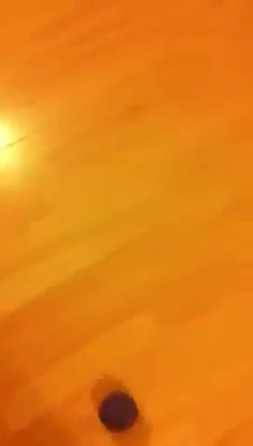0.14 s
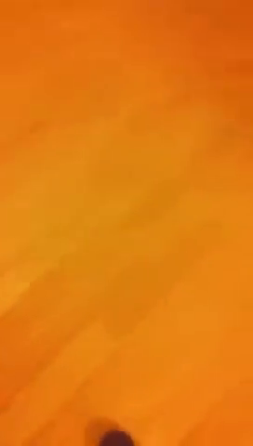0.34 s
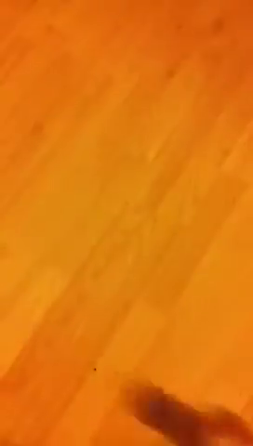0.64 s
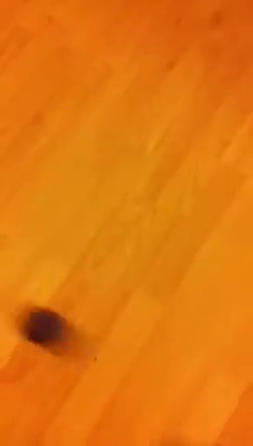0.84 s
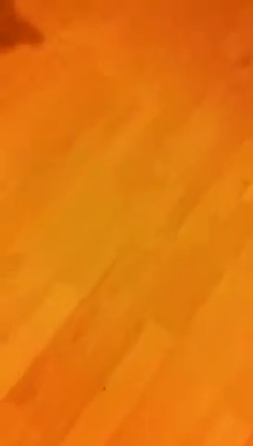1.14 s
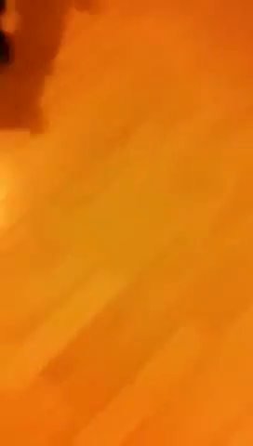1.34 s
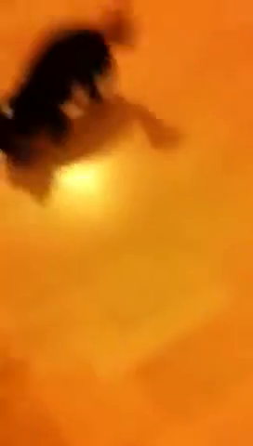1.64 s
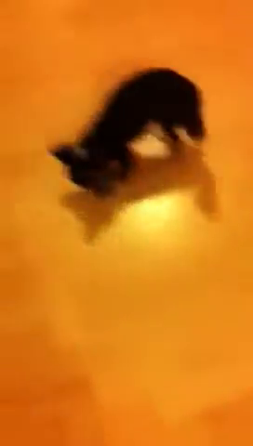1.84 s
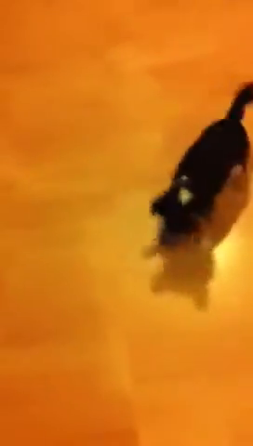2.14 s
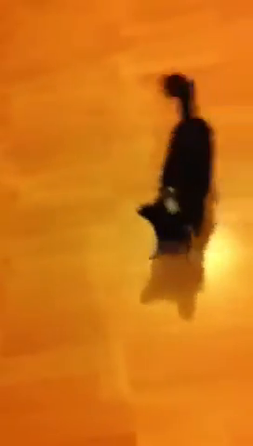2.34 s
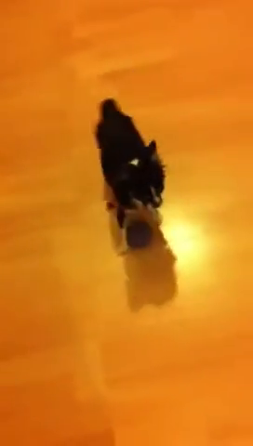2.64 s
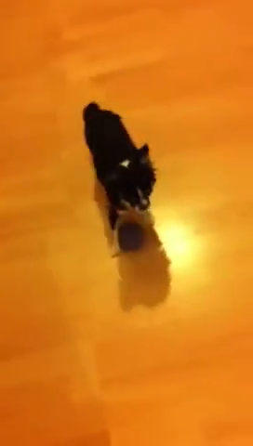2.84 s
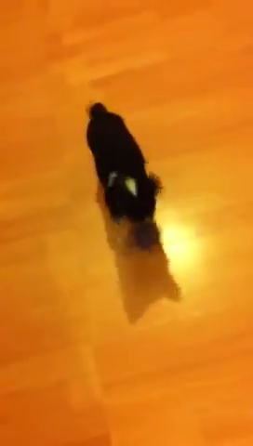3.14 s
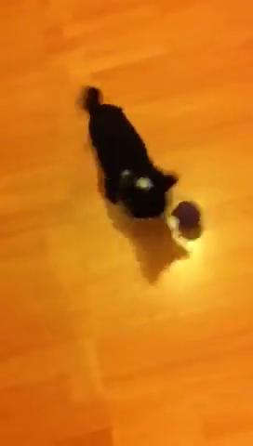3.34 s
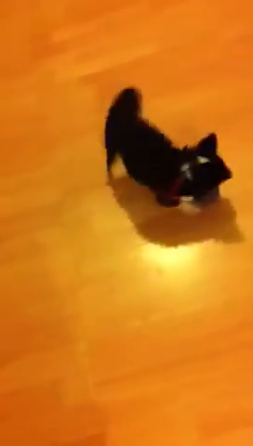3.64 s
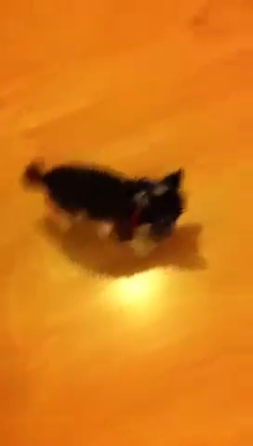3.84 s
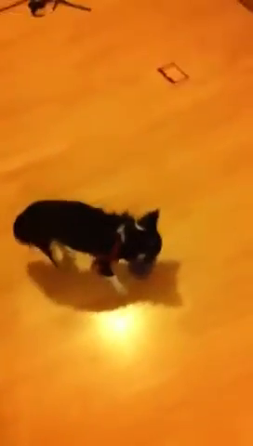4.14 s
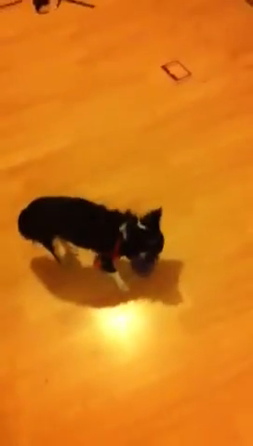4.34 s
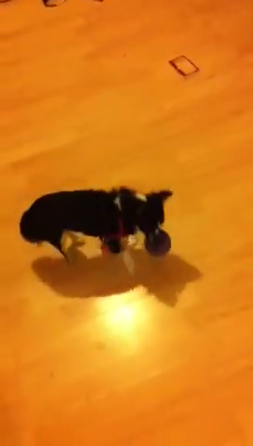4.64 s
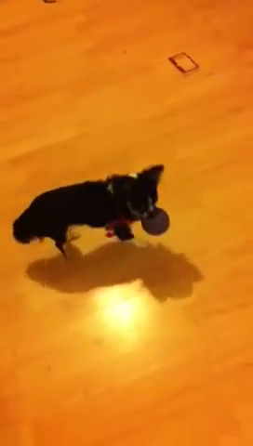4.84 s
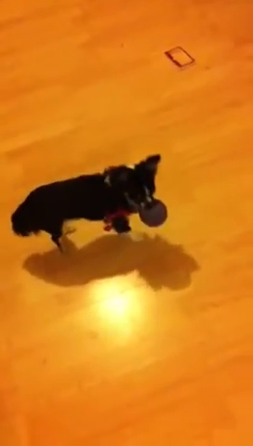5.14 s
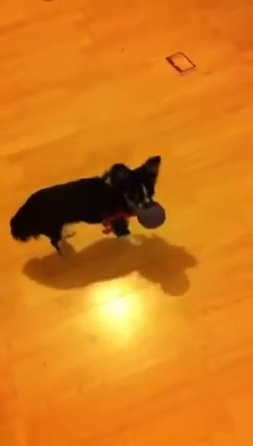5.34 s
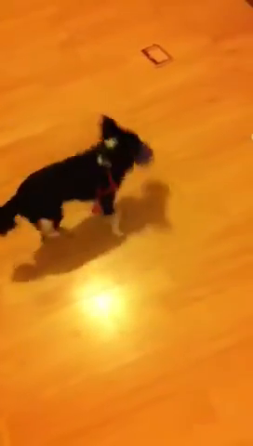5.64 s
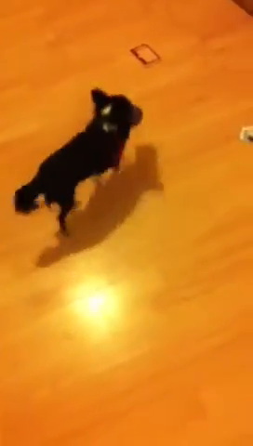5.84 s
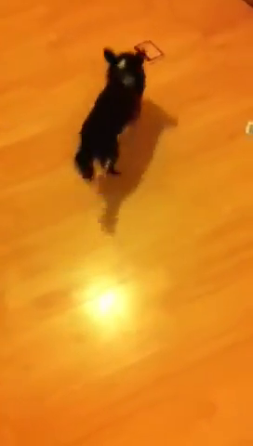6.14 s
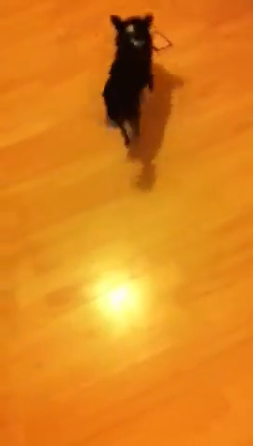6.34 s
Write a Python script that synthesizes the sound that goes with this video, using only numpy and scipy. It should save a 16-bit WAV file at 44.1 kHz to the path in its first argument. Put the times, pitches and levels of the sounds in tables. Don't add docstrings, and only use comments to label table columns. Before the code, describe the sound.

A close microphone in a quiet, hard-surfaced room with short reverberation; faint low hum, rumble and soft hiss run throughout. At 0.15-0.6 s a small dog gives a barely audible, hoarse rising whine, with soft paw thumps on wood. At 0.7 s a nudged rubber ball lets out a tiny weak peep. From 1.0 to 1.7 s claws tick sharply and pads scuff and thump in a rush, with very high, thin tag jingles from 1.55 s. At 1.75 s comes the first bite: a loud, nasal, reedy squeak about a third of a second long, jumping up, dipping, wavering, then dropping. Scuffs and dull knocks follow at 2.3-2.6 s and 3.3-3.5 s. At 3.6 s a second, shorter squeak sags in pitch and fades. One scuff at 3.9 s, then near silence with tiny ticks around 4.9 s. From 5.5 s light claw steps, a dry close click at 5.8 s, and delicate tag tinkles until 6.45 s.

```python
import sys
import numpy as np
from scipy import signal
from scipy.fft import rfft, irfft
from scipy.io import wavfile
from scipy.ndimage import uniform_filter1d

SR = 44100
rng = np.random.default_rng(int(sys.argv[2]) if len(sys.argv) > 2 else 0)


def decibels_to_gain(level_db):
    exponent = np.asarray(level_db, float) / 20
    return 10 ** exponent


def to_wav(s):
    ch = np.atleast_2d(s).T
    pcm = np.round(np.clip(ch, -1, 1) * 32767)
    wavfile.write(sys.argv[1], SR, pcm.astype(np.int16))


N = 286958
TIME = np.arange(N) / SR

# freq_hz, density_db
FLOOR = [(20, -45), (85, -38), (149, -12.5), (260, -14.5), (420, -23), (1160, -33.5), (5000, -37.5),
         (16000, -42.5)]
FLOOR_DB = -54.5
# freq_hz, level_db (rms), width_hz
HUM = [(109.3, -76, 6.8), (151.2, -63, 0.84), (165.8, -68.5, 12.1), (203.2, -64, 0.91),
       (251.5, -69.5, 5.78)]
MURMUR_HZ, MURMUR_DB = 925, -74.5

# freq_hz, t60_s
ROOM_T60 = [(250, .45), (1000, .45), (4000, .43), (8000, .45), (14000, .4)]
EARLY_T60_S, EARLY_DB = 0.25, 2
# delay_s, level_db
ECHOES = [(.0045, -11), (.012, -6), (.021, -13)]
SQUEAK_ROOM_DB = 2.5

# start_s, peak_db, pitch_hz
SNAP = [(5.7789, -32, 5200)]

# start_s, length_s, first_pitch_hz, last_pitch_hz, top_db
WHINES = [
    (0.141, .45, 586.7, 826, -60.5),
]
# length_share, glide_share, level_db
WHINE_SHAPE = [(0, 0, -37), (.15, .2, -3.5), (.4, .45, -1.5), (.55, 0.92, -0.5), (.75, .9, -5.5),
               (1, 0.7, -25)]
# freq_hz, level_db
THROAT = [(500, -39), (900, 7.5), (1400, 1), (2100, 0.5), (2700, -10.5), (3000, -19), (5000, -28.5)]

# start_s, peak_db
JINGLE = [(1.5534, -45), (1.6297, -27.5), (1.6444, -48), (1.726, -34), (6.0297, -58), (6.0687, -33),
          (6.1044, -60), (6.2143, -45), (6.3131, -56), (6.3719, -51), (6.4486, -28), (6.4694, -58)]
# freq_hz, level_db, t60_s
TAG = [(8280, -20, .15), (10405, -15, 0.17), (12560, -25, 0.092), (14900, -10, .12), (14790, 3.5, 0.12)]

# start_s, peak_db, note_hz (strongest board note)
THUMPS = [(0.317, -46, 240), (0.493, -52, 765), (0.707, -50.5, 830), (0.795, -51, 355), (0.861, -50, 816),
          (1.128, -40, 235), (1.23, -42, 330), (1.329, -43, 320), (1.489, -28, 236), (1.528, -97, 516),
          (1.584, -38.5, 444), (1.658, -31, 240), (1.697, -47, 234), (2.129, -53.5, 455), (2.293, -38, 320),
          (2.32, -44, 616), (2.612, -52, 388), (3.334, -47.5, 456), (3.529, -43.5, 577), (3.669, -47, 674)]
# freq_hz, level_db, t60_s
BOARDS = [(240, -4.5, 0.069), (320, 13.5, 0.0092), (457, 14, 0.021), (540.5, 12, 0.027), (793, 15, 0.017),
          (1156, 20.5, 0.0064)]

# start_s, peak_db, room_share_db
TICKS = [(0.719, -35, 3), (1.0636, -28, 4.5), (1.229, -20.5, 2.5), (1.309, -31, 5), (1.3444, -24, 3.5),
         (1.441, -34, -18), (1.5255, -24, 8), (4.8604, -48, 9), (4.928, -43.5, 8), (5.5494, -44, -8),
         (5.8094, -44, 5), (5.9293, -44.5, 0), (6.069, -41.5, 4), (6.1634, -44.5, 6), (6.4472, -43, 11.5),
         (6.4947, -36, 3)]
# start_s, peak_db, room_share_db
SCUFFS = [(0.4294, -38.5, -4), (0.4883, -49, 16), (0.8612, -42.5, -5), (1.0077, -42, 5), (1.489, -25, 8),
          (1.6593, -18.5, 7), (1.7, -37.5, 18), (2.2915, -25, 6), (2.3074, -31.5, 15.5), (2.444, -33, 8.5),
          (2.6179, -32, 10.5), (2.6434, -24.5, 1.5), (3.328, -25, 8.5), (3.429, -55, 22.5),
          (3.4882, -44.5, 15), (3.5344, -46.5, 20.5), (3.939, -31.5, 3), (4.62, -52, 7), (5.692, -50, 17),
          (5.9844, -48, 5), (6.1994, -46, 2), (6.4082, -43, 4)]
TICK_HZ, SCUFF_HZ = 9200, 4760
TICK_TOP_HZ, SCUFF_TOP_HZ = 19000, 13500
SLIDE_MS, SLIDE_MS_PER_DB = 1.6, 0.1
KNOCK_HZ = 4210
TICK_KNOCK_DB, SCUFF_KNOCK_DB = -7, -6

# start_s, pitch_hz, level_db
PEEP = [
    (.707, 1054, -65),
    (.716, 1055, -54.5),
    (.78, 1032, -73),
]
PEEP_DB_PER_OCTAVE = -10
# start_s, pitch_hz
SQUEAKS = [
    [(1.752, 1158), (1.778, 1230), (1.805, 1170), (1.865, 1107), (1.92, 1116), (1.97, 1139), (2.045, 1139),
     (2.068, 1092), (2.09, 1034)],
    [(3.611, 1192), (3.635, 1222), (3.655, 1164), (3.69, 1088), (3.725, 1073), (3.775, 1119), (3.81, 1086),
     (3.845, 1038), (3.868, 1022)],
]
# multiple, level_db
REED = [
    [(1, -1.5), (2, -9), (3, -6.5), (4, -7), (5, -1.5), (6, -1), (7, -5.5), (8, -12), (9, -19.5), (10, -19),
     (11, -26.5), (12, -33), (13, -44)],
    [(1, 1), (2, -9), (3, -9), (4, -6.5), (5, -2), (6, 3), (7, -7), (8, -12), (9, -15), (10, -17),
     (11, -19), (12, -37), (13, -34)],
]
# level_db (at the middle pitch), fade_db_per_s (as the ball empties)
BITES = [
    (-29, -2.5),
    (-28.5, -26.5),
]
REED_MID_HZ, REED_DB_PER_HZ = 1144, 0.0342
REED_STOP_HZ, REED_STOP_DB_PER_HZ = 1067, 0.12
REED_ATTACK_S, REED_ATTACK_DB = 0.012, -6


def rms_one(x):
    return x / np.sqrt(np.mean(x ** 2) + 1e-20)


def at_hz(points, hz):
    table = np.array(points)
    return np.interp(np.log(hz), np.log(table[:, 0]), table[:, 1])


def drift(rate):
    r = np.exp(-80 * np.pi * rate / SR)
    chance = rng.standard_normal(N // 40 + 2002)
    slow = signal.lfilter([1], [1, -2 * r, r * r], chance)[2000:]
    return np.interp(np.arange(N) / 40, np.arange(len(slow)), rms_one(slow))


def resonance(x, hz, width):
    r = np.exp(-np.pi * width / SR)
    poles = [1, -2 * r * np.cos(2 * np.pi * hz / SR), r * r]
    return signal.lfilter(np.array([1, 0, -1]) * (1 - r * r) / 2, poles, x)


def ring(clicks, hz, t60):
    r, w = decibels_to_gain(-60 / (t60 * SR)), 2 * np.pi * hz / SR
    return signal.lfilter([0, np.sin(w)], [1, -2 * r * np.cos(w), r * r], clicks + 1e-18)


def filtered(x, order, hz, kind):
    return signal.sosfilt(signal.butter(order, hz, kind, fs=SR, output="sos"), x)


def note(rows, partial_db, wobble, flicker_db, flicker_rate, edge_s):
    s, hz, level_db = np.transpose(rows)
    a, b = int(s[0] * SR), int(s[-1] * SR)
    t = TIME[a:b]
    glide = uniform_filter1d(np.interp(t, s, hz), size=400, mode="nearest")
    pitch = glide * (1 + wobble * drift(81)[a:b])
    phase = 2 * np.pi * np.cumsum(pitch) / SR
    flicker = flicker_db * drift(flicker_rate)
    wave = 0
    for k in range(1, 14):
        partial_level = partial_db(k, k * pitch) + np.roll(flicker, 9000 * k)[a:b]
        wave = wave + decibels_to_gain(partial_level) * np.sin(k * phase + k * k)
    edges = np.clip(np.minimum(t - s[0], (s[-1] - t) / 4) / edge_s, 0, 1)
    out = np.zeros(N)
    out[a:b] = rms_one(wave) * decibels_to_gain(np.interp(t, s, level_db)) * edges
    return out


def background():
    hz = np.maximum(np.arange(N // 2 + 1) * SR / N, 1)
    spectrum = rfft(rng.standard_normal(N)) * decibels_to_gain(at_hz(FLOOR, hz))
    out = decibels_to_gain(FLOOR_DB - 7.0) * rms_one(irfft(spectrum, N))
    for line_hz, db, width in HUM:
        phase = 2 * np.pi * np.cumsum(line_hz + width * 0.287 * drift(5.53)) / SR
        out += np.sqrt(2) * decibels_to_gain(db + 0.5 * width * drift(15.0)) * np.sin(phase)
    far = resonance(resonance(rng.standard_normal(N), MURMUR_HZ, 280), MURMUR_HZ, 280)
    return out + rms_one(far) * decibels_to_gain(MURMUR_DB + 4.07 * drift(19.6))


def room():
    t = np.arange(int(0.9 * SR)) / SR
    white, tail = rng.standard_normal(len(t)), 0
    edges = 90 * 2 ** np.arange(0, 8, 0.5)
    for low, high in zip(edges, edges[1:]):
        band = filtered(white, 2, [low, high], "band")
        tail = tail + band * decibels_to_gain(-60 * t / at_hz(ROOM_T60, np.sqrt(low * high)))
    early = rng.standard_normal(len(t)) * decibels_to_gain(-60 * t / EARLY_T60_S)
    tail = tail / np.sqrt(np.sum(tail ** 2)) + decibels_to_gain(EARLY_DB) * early / np.sqrt(np.sum(early ** 2))
    tail = tail * np.clip(t / 0.0046, 0, 1)
    return tail / np.sqrt(np.sum(tail ** 2))


def walls(x):
    out = x
    for delay_s, db in ECHOES:
        out = out + decibels_to_gain(db) * np.concatenate([np.zeros(int(delay_s * SR)), x])[:N]
    return out


def snap():
    s, peak_db, hz = SNAP[0]
    click = np.zeros(N)
    click[int(s * SR)] = decibels_to_gain(peak_db + 3.0)
    click = filtered(click, 3, 3300, "high")
    return 1.7 * click + 0.5 * ring(click, hz, 0.0032)


def whine():
    along, glide, swell_db = np.transpose(WHINE_SHAPE)
    out = 0
    for s, length, first, last, top_db in WHINES:
        rows = np.transpose([s + length * along, first + (last - first) * glide, top_db + swell_db])
        out = out + note(rows, lambda k, hz: at_hz(THROAT, hz),
                         wobble=0.045, flicker_db=6.0, flicker_rate=90, edge_s=0.01)
    return out


def tag():
    s, peak_db = np.transpose(JINGLE)
    at = (s * SR).astype(int)
    chance, out = rng.standard_normal((len(at), len(TAG))), 0
    for k, (hz, db, t60) in enumerate(TAG):
        clicks = np.zeros(N)
        clicks[at] = decibels_to_gain(peak_db + db - 10.5 + 2.0 * chance[:, k])
        out = out + ring(clicks, hz, t60)
    return out


def thumps():
    s, peak_db, note_hz = np.transpose(THUMPS)
    out = 0
    for hz, db, t60 in BOARDS:
        blows = np.zeros(N)
        octaves_off = np.abs(np.log2(hz / note_hz))
        blows[(s * SR).astype(int)] = decibels_to_gain(peak_db + db - 5.5 - 12.8 * octaves_off)
        out = out + resonance(ring(blows, hz, t60), hz, 0.37 * hz)
    return out


def steps(rows, hz, knock_db, top_hz):
    t = np.arange(4000) / SR
    both = np.zeros((2, N + 4000))
    for s, peak_db, room_db in rows:
        at = int(s * SR)
        slide_ms = np.clip(SLIDE_MS + SLIDE_MS_PER_DB * (peak_db + 47), 0.2, 25)
        scratch = rng.standard_normal(4000) ** 3 / 4 * np.exp(-1000 * t / slide_ms)
        scratch[0] = 2.5
        both[0, at:at + 4000] += decibels_to_gain(peak_db) * scratch / np.abs(scratch).max()
        both[1, at] = decibels_to_gain(peak_db + room_db + 4.5)
    both = 0.56 * resonance(both, hz, 0.25 * hz) + 0.95 * both
    both = filtered(both[:, :N], 2, [500, min(top_hz, 0.45 * SR)], "band")
    high = filtered(both, 4, KNOCK_HZ, "high")
    low = filtered(both, 4, KNOCK_HZ, "low")
    return high + decibels_to_gain(knock_db) * low


def claws():
    ticks = steps(TICKS, TICK_HZ, TICK_KNOCK_DB, TICK_TOP_HZ)
    scuffs = steps(SCUFFS, SCUFF_HZ, SCUFF_KNOCK_DB, SCUFF_TOP_HZ)
    return ticks + scuffs


def peep():
    return note(PEEP, lambda k, hz: PEEP_DB_PER_OCTAVE * np.log2(k),
                wobble=0.02, flicker_db=8.0, flicker_rate=79, edge_s=0.0014)


def squeaker():
    out = 0
    for rows, (bite_db, fade), orders in zip(SQUEAKS, BITES, REED):
        s, pitch = np.transpose(rows)
        since = s - s[0]
        level = bite_db + fade * since + REED_DB_PER_HZ * (pitch - REED_MID_HZ)
        level = level - REED_STOP_DB_PER_HZ * np.maximum(REED_STOP_HZ - pitch, 0)
        level = level + REED_ATTACK_DB * np.exp(-since / REED_ATTACK_S)

        def partial_db(k, hz):
            return orders[k - 1][1] + 0.0013 * k * (hz / k - REED_MID_HZ)

        out = out + note(np.transpose([s, pitch, level]), partial_db,
                         wobble=0.002, flicker_db=2.0, flicker_rate=26.7, edge_s=0.002)
    return out * decibels_to_gain(-2.0)


def scene():
    scratches, scratches_sent = claws()
    reed_and_voice = squeaker() + peep() + whine()
    boards, jingle = thumps(), tag()
    sent = decibels_to_gain(SQUEAK_ROOM_DB) * reed_and_voice + scratches_sent
    sent = sent + decibels_to_gain(3.5) * boards + decibels_to_gain(-11.0) * jingle
    wet = signal.fftconvolve(sent, room())[:N]
    near = walls(reed_and_voice + scratches + boards + jingle)
    return (near + wet + snap() + background())[None]


def low_pass(x):
    return signal.sosfilt(signal.butter(12, 16800, fs=SR, output="sos"), x)


def record(dry):
    x = filtered(dry, 1, 18, "high")
    x = signal.sosfilt(signal.ellip(10, 0.5, 70, 15750, fs=SR, output="sos"), x)
    return low_pass(x)


dry = scene()
out = record(dry)
to_wav(out)
```